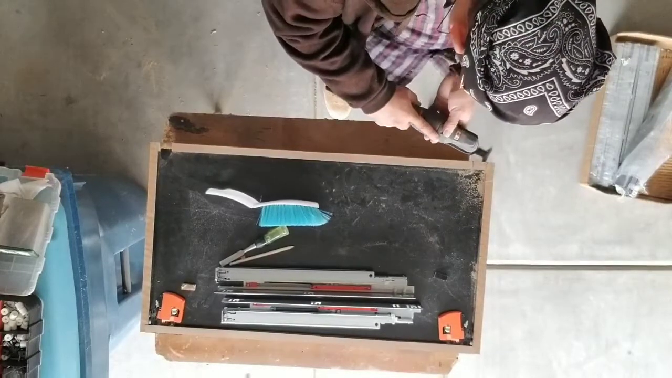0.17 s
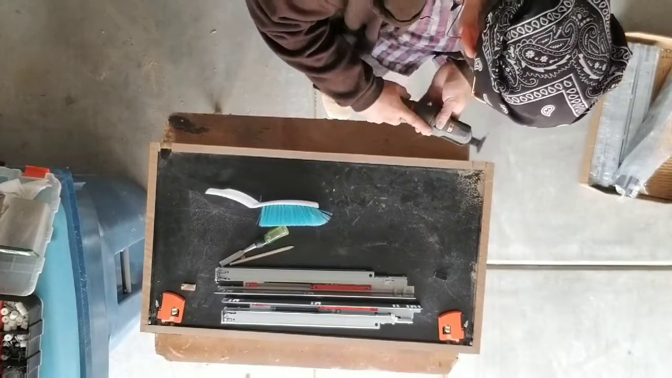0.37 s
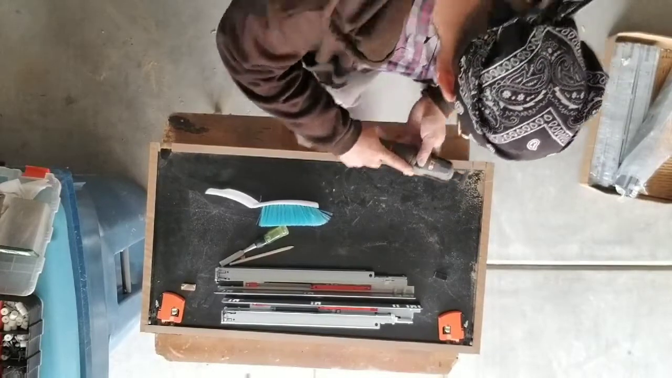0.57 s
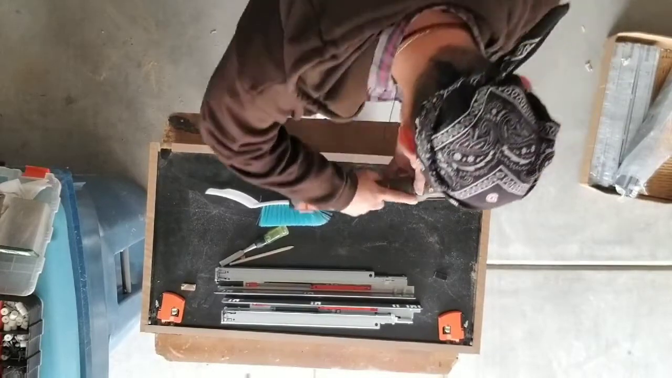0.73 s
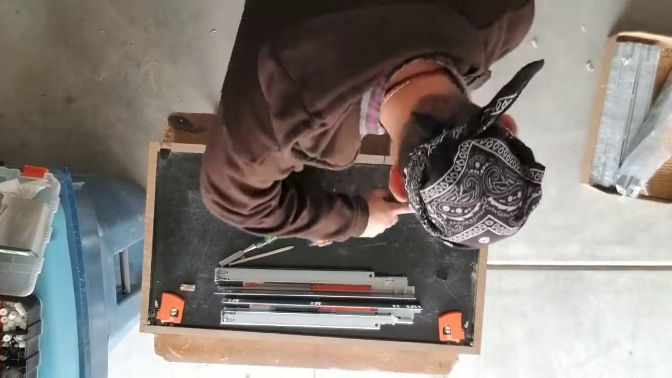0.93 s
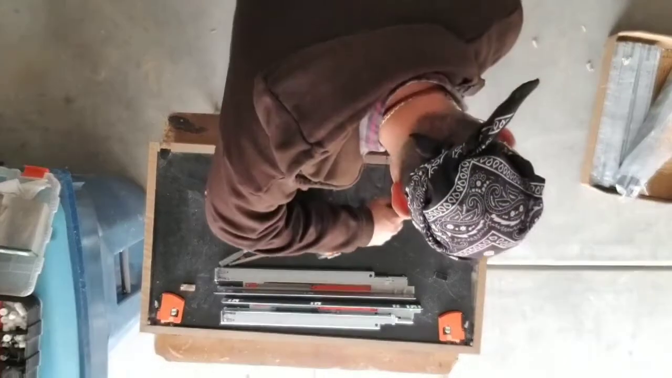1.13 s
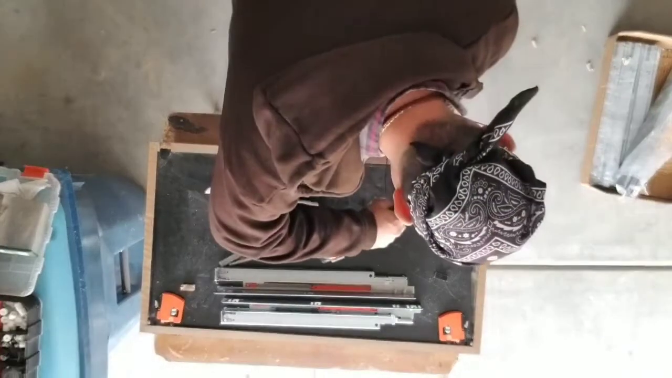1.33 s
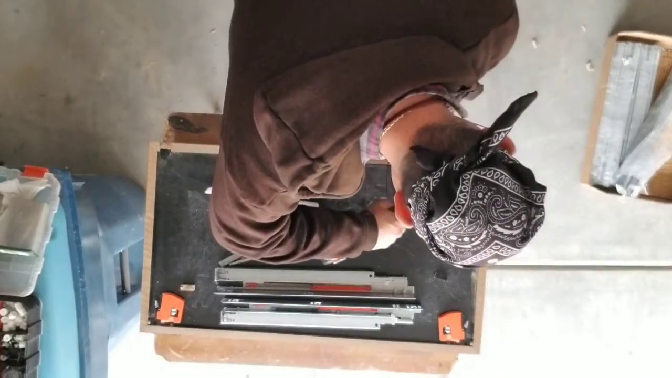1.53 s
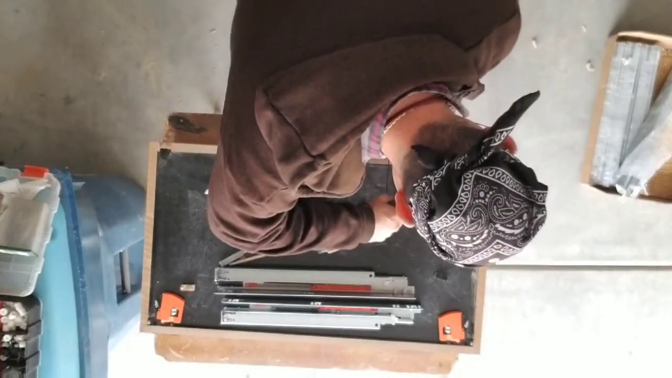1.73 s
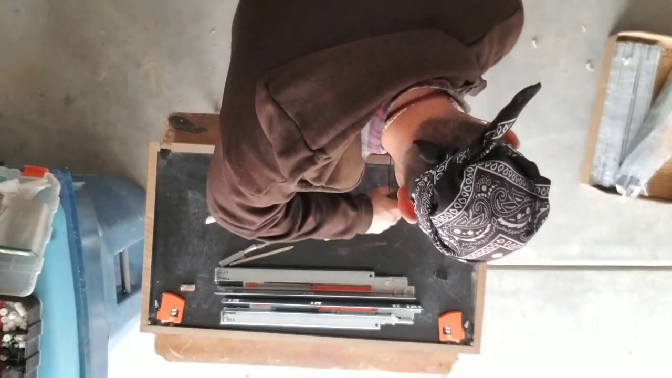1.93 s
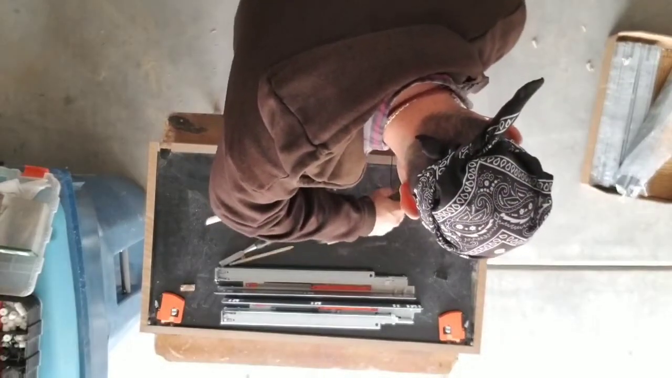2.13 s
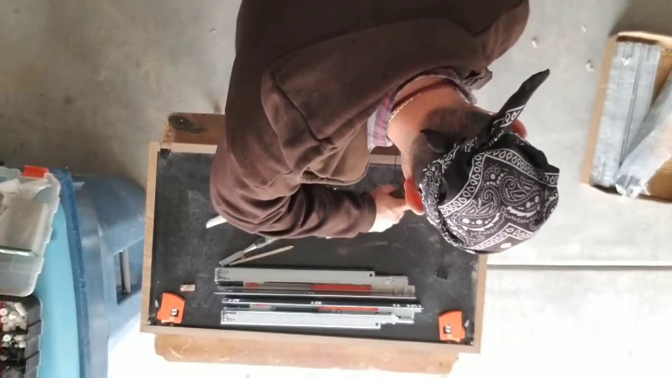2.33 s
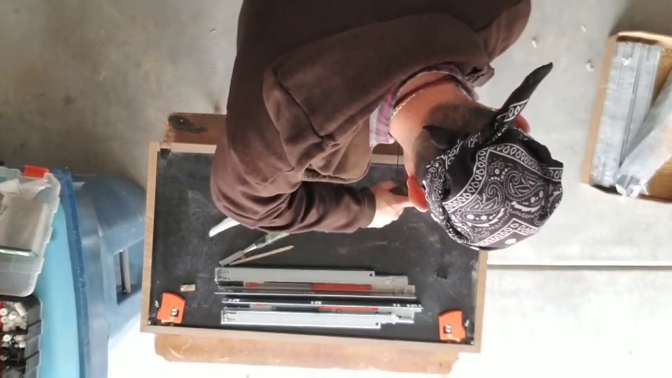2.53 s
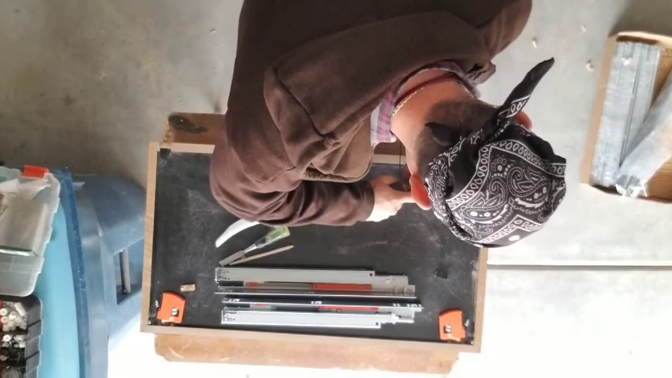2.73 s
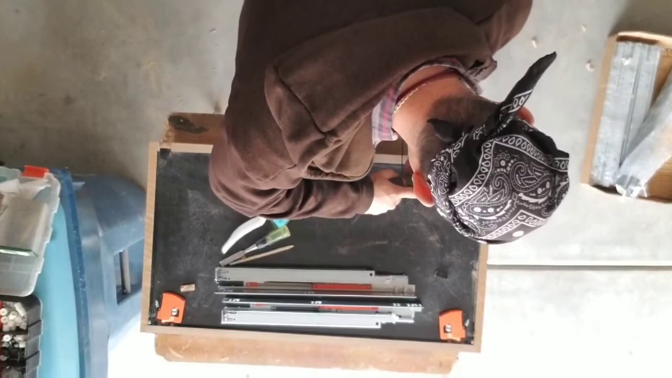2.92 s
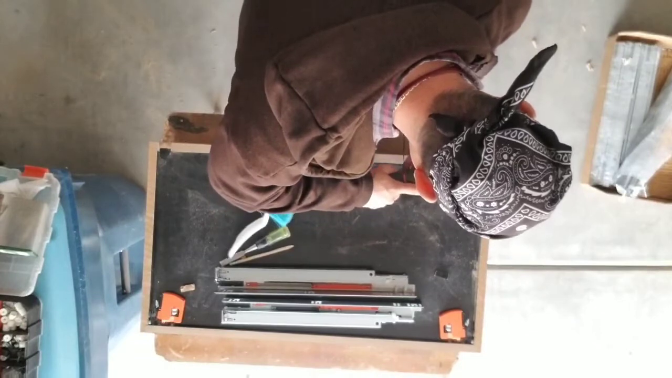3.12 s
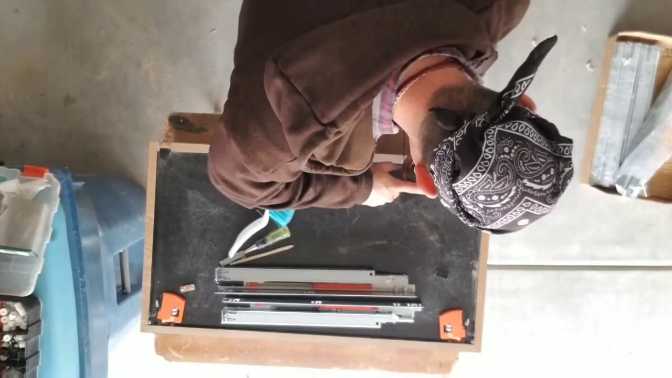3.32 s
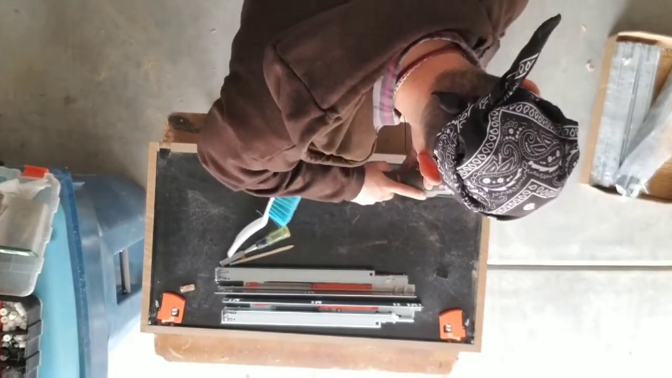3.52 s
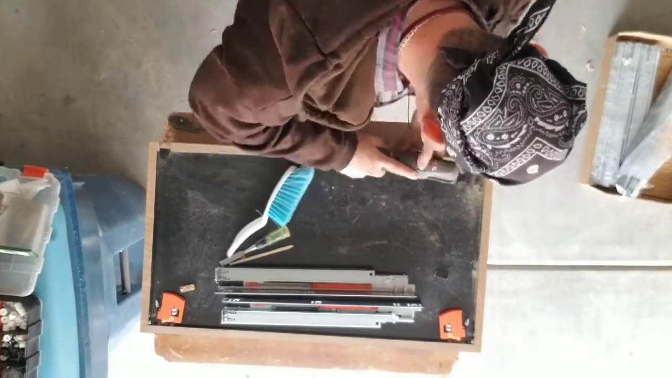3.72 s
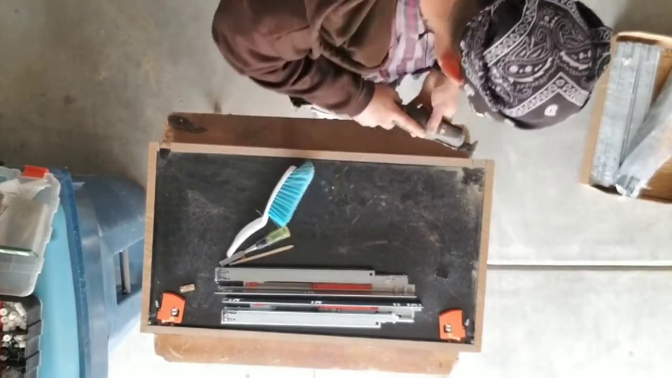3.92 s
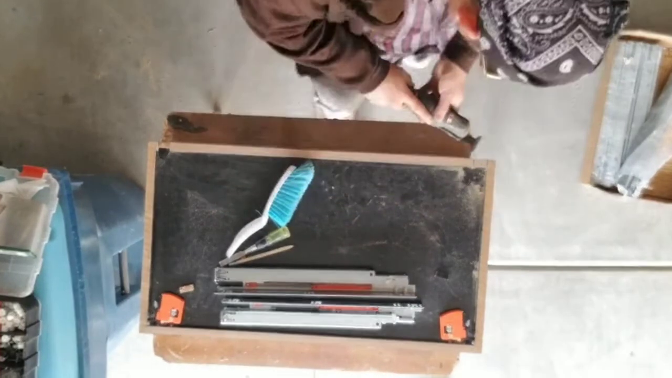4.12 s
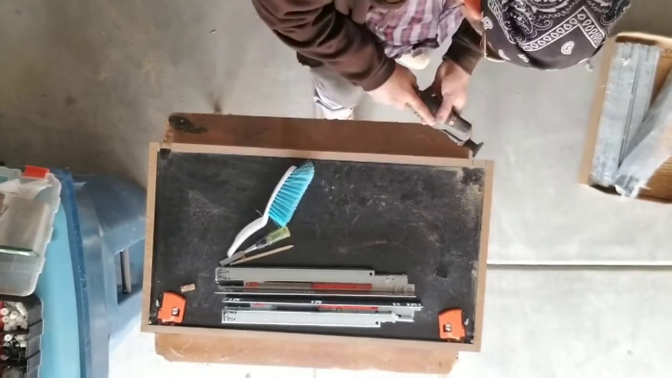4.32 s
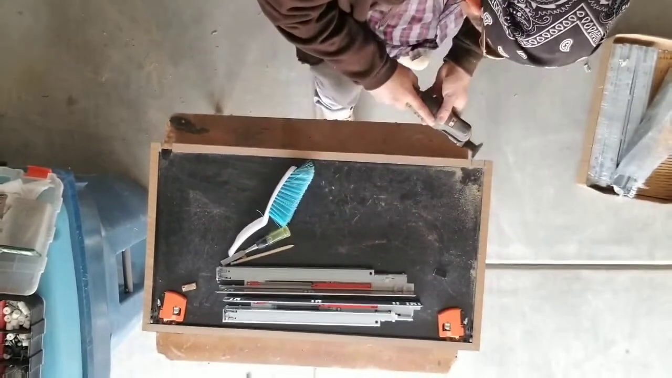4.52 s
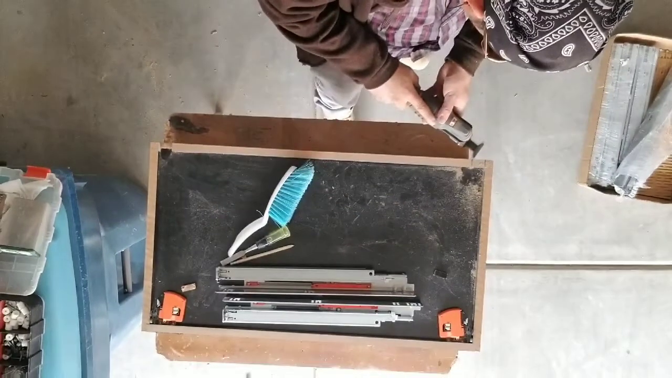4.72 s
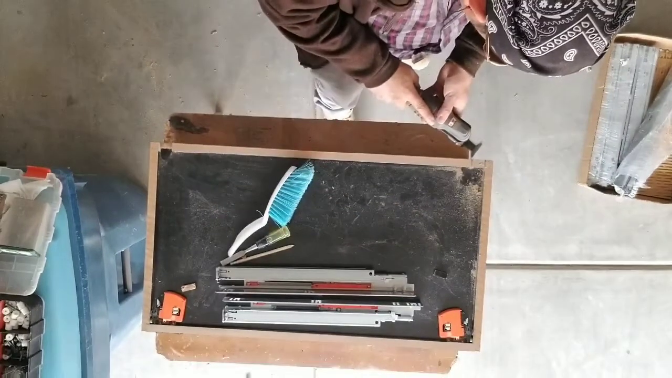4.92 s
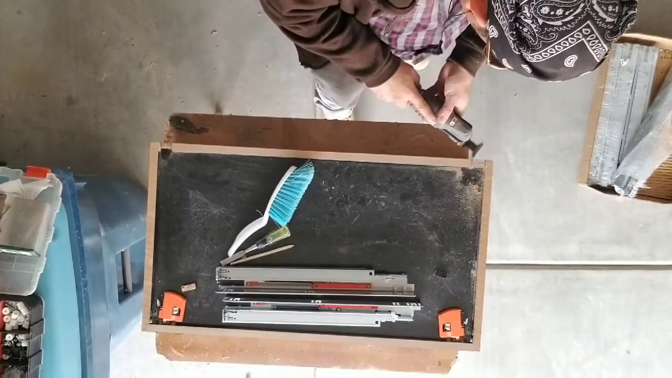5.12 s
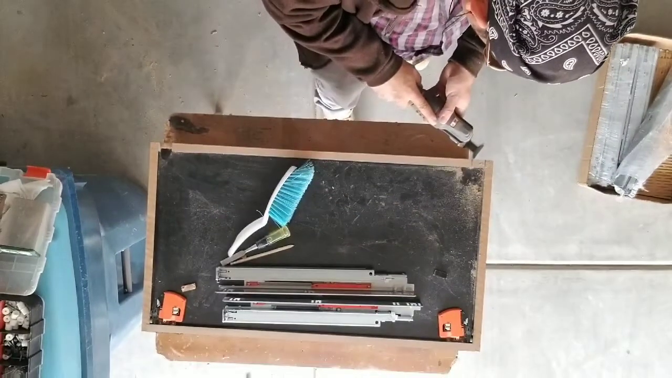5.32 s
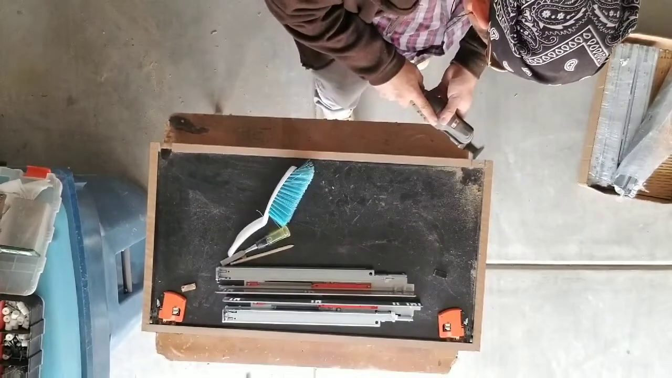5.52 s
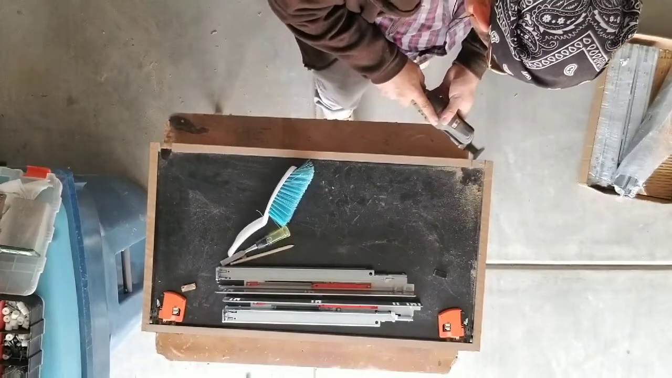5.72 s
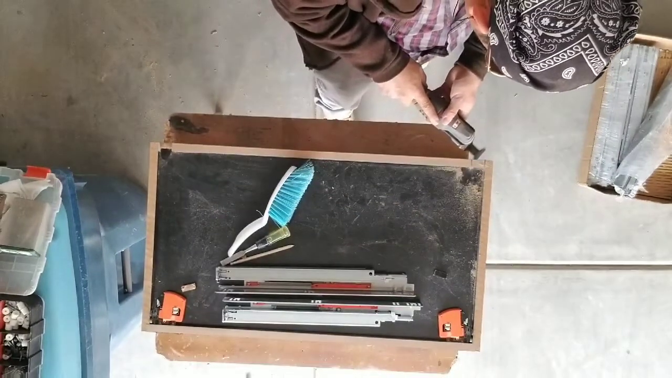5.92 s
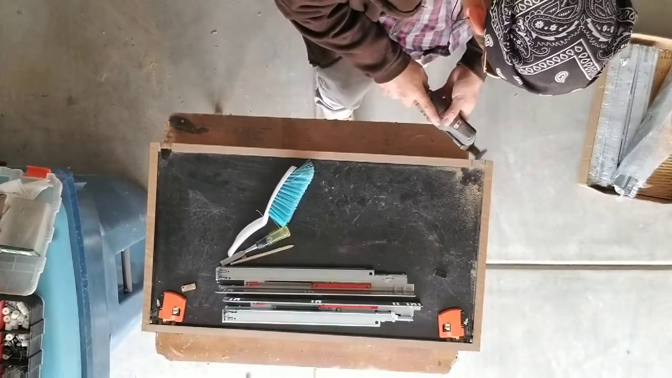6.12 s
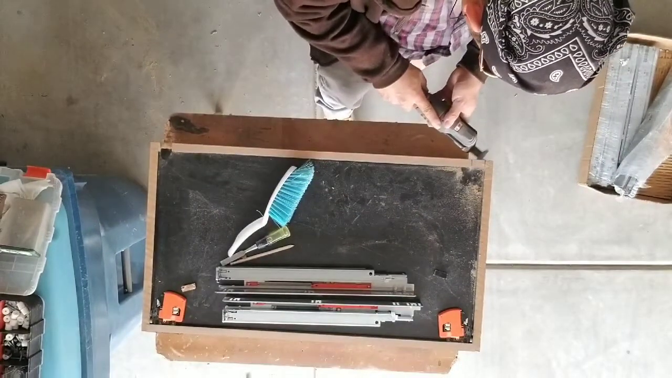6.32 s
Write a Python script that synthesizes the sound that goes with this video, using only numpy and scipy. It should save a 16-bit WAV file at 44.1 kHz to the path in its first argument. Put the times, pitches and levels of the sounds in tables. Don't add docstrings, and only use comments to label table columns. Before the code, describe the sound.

A harsh buzzing oscillating saw finishes one cut, then makes two more raspy cuts into a wooden box, ringing in a hard-walled garage.

```python
import sys
import numpy as np
from scipy import signal
from scipy.fft import rfft, irfft, next_fast_len
from scipy.io import wavfile
from scipy.ndimage import uniform_filter1d

SR = 44100
rng = np.random.default_rng(int(sys.argv[2]) if len(sys.argv) > 2 else 0)


def decibels_to_gain(level_db):
    exponent = np.asarray(level_db, float) / 20
    return 10 ** exponent


def bounce(signal):
    frames = np.transpose(np.atleast_2d(signal))
    limited = np.clip(frames, -1, 1)
    pcm = np.round(limited * 32767).astype(np.int16)
    wavfile.write(sys.argv[1], SR, pcm)


N = 281342
LEAD = .7
M = N + int(LEAD * SR)
STEP = 32
EDGE_S = .048


def unit(x):
    return x / np.sqrt(np.mean(x ** 2) + 1e-20)


def along(points, hz):
    f, v = np.transpose(points)
    return np.interp(np.log(hz + 1), np.log(f + 1), v)


def curves(tables):
    t = np.arange(M) / SR - LEAD
    s, *cols = np.transpose(np.vstack(tables))
    gate = np.zeros(M)
    for rows in tables:
        start, stop = rows[0][0], rows[-1][0]
        gate += (t < stop) & ((t >= start) | (start < .01))
    return [np.interp(t, s, c) for c in cols], uniform_filter1d(gate, size=96)


def swells(table):
    t = np.arange(0, M, STEP) / SR - LEAD
    start, length, *cols = np.transpose(table)[:, :, None]
    stop = start + length
    start = np.where(start < .01, -2 * LEAD, start)
    inside = np.minimum(t - start, stop - t)
    return np.sin(np.pi / 2 * np.clip(inside / EDGE_S + .5, 0, 1)) ** 2, cols


def smooth(slow):
    return uniform_filter1d(np.repeat(slow, STEP)[:M], size=2 * STEP)


def spells(table):
    shape, (db,) = swells(table)
    return smooth((shape * db).sum(0))


def wobble(rate, channels=2, step=1):
    knots = rng.standard_normal((channels, int(M * 200 / SR) + 4))
    at = np.arange(0, M, step) * rate / SR
    return np.array([np.interp(at, np.arange(len(k)), k) for k in knots])


def noise(gain, shared):
    a, b = rng.standard_normal((2, M))
    turn = np.arccos(np.clip(shared, -1, 1)) / 2
    pair = np.cos(turn) * a + np.sin(turn) * np.array([b, -b])
    pair[1] = np.roll(pair[1], shift=5)
    size = next_fast_len(M)
    return unit(irfft(rfft(pair, size) * gain(np.fft.rfftfreq(size, 1 / SR)), size)[:, :M])


def coloured(points, shared):
    return noise(lambda f: decibels_to_gain(along(points, f)), shared)


def resonances(table):
    return lambda f: sum(decibels_to_gain(db) / (1 + ((f - hz) / w) ** 2) for hz, w, db in table)


def patchy(x, depth_db):
    z = signal.stft(x, nperseg=256)[2]
    field = rng.standard_normal(z.shape[1:])
    field = uniform_filter1d(uniform_filter1d(field, size=3, axis=0), size=12, axis=1)
    return unit(signal.istft(z * decibels_to_gain(depth_db * unit(field)), nperseg=256)[1][:, :M])


# pitch_hz, level_db (per Hz)
QUIET = [(18, -50.5), (30, -14.5), (51, -13.5), (105, -4.5), (156, -14.5), (309, -8.5), (535, -16.5),
         (579, -11), (928, -18.5), (5090, -38), (15700, -41.5)]


def quiet_air():
    return decibels_to_gain(-66.5 + 2.5) * coloured(QUIET, .3)


# pitch_hz, fade_s (time to fall 60 dB)
GARAGE = [(250, 0.26), (600, 1), (1000, 0.84), (3000, 0.79), (8000, 0.53), (15000, 0.098)]


def garage(x):
    burst = rng.standard_normal((2, int(1.5 * SR)))
    hz, t, z = signal.stft(burst, SR, nperseg=256)
    fade = decibels_to_gain(-60 * t / along(GARAGE, hz)[:, None])
    tail = signal.istft(z * fade, SR, nperseg=256)[1]
    late = np.pad(x, ((0, 0), (400, 0)))
    return signal.fftconvolve(late, tail / np.linalg.norm(tail[0]), axes=1)[:, :M]


def panel(x, hz=1020, t60=0.54, db=-3):
    pole = decibels_to_gain(-60 / (t60 * SR))
    turn = 2 * np.pi * hz / SR
    return decibels_to_gain(db) * signal.lfilter([1 - pole, 0, pole - 1], [1, -2 * pole * np.cos(turn), pole ** 2], x, axis=1)


# time_s, level_db
SHUFFLE = [
    [(0.78, -62), (0.998, -51.5), (1.05, -71), (1.07, -32)],
    [(3.95, -61), (3.958, -64), (3.98, -65.5), (4.114, -51.5), (4.176, -65), (4.3, -79.5)],
]
# pitch_hz, level_db (per Hz)
CLOTH = [(120, -47.5), (200, -3.5), (299, -5.5), (1200, -18), (2070, -12.5), (3640, -9), (3850, -6),
         (4300, -8), (15700, -29)]


def shuffle():
    (brush_db,), gate = curves(SHUFFLE)
    return gate * decibels_to_gain(brush_db + 1.7 * wobble(6.4, channels=1)) * coloured(CLOTH, 0.49)


# start_s, peak_db, pitch_hz, length_s
CREAKS = [
    (0.823, -49, 302.3, 0.06),
    (3.762, -46, 410, 0.035),
    (3.832, -48, 410, 0.019),
    (3.916, -42, 407, 0.013),
    (3.992, -46, 410, 0.016),
    (4.071, -46.5, 402, 0.023),
    (4.133, -54, 418, .02),
]


def creaks():
    out = np.zeros((2, M))
    for s, db, hz, length in CREAKS:
        t = np.arange(int(length * SR)) / SR
        hollow = np.sin(2 * np.pi * hz * t) + .12 * np.sin(2 * np.pi * 3.8 * hz * t)
        shape = np.sin(np.pi * np.sqrt(t / length)) ** .5
        out[:, round((s + LEAD) * SR):][:, :len(t)] += decibels_to_gain(db) * shape * hollow
    return out


# pitch_hz, level_db (per Hz)
RUMBLE = [(12, -53), (20, -10), (43, -13), (81, -2.5), (199, -12), (220, -11.5), (290, -19), (480, -120)]
# start_s, length_s, gain_db
BUMPS = [
    (2.35, .1, 5),
    (2.68, .14, 11),
    (2.88, .25, 6),
    (5.36, .12, 6),
    (5.92, .5, 7),
]


def rumble(motor_db):
    level_db = motor_db - 25 + spells(BUMPS) + 2.2 * wobble(4.9)
    return decibels_to_gain(level_db) * coloured(RUMBLE, 0.1)


# pitch_hz, width_hz, level_db
WHINE = [(11680, 30, 4.5), (13000, 210, -9.5), (15028, 360, -6.5)]
# start_s, length_s, gain_db
WHINES = [
    (0, .5, 7),
    (1.1, .17, 13),
    (1.27, .25, 6),
    (3.44, .12, 6),
    (4.65, .62, 8),
    (5.27, .66, 13),
]


def whine(motor_db):
    level_db = motor_db - 20.5 + spells(WHINES) + 7.5 + 2.8 * wobble(9, channels=1)
    return decibels_to_gain(level_db) * noise(resonances(WHINE), 0.85)


# pitch_hz, level_db (per Hz)
HISS = [(3820, -12), (6500, -11.5), (7960, -5.5), (10200, -3), (12200, -1), (13300, -1), (15100, -7),
        (15700, -12.5)]


def hiss(motor_db, free):
    return decibels_to_gain(motor_db - 7 * free + 1.4 * wobble(13, channels=1)) * coloured(HISS, 0.084)


# pitch_hz, width_hz, level_db
BOX = [(297, 44, -4), (410, 130, -6.5), (725, 105, 3.5), (1040, 33, 5.5)]


def rattle(contact_db, chatter, free):
    level_db = contact_db - 14.5 + 7 * np.minimum(chatter, 1.2) + 13 * np.sqrt(free)
    return decibels_to_gain(level_db + 2.9 * wobble(25, channels=1)) * noise(resonances(BOX), 0.16)


# pitch_hz, level_db (per Hz)
RASP = [(60, -55.5), (200, -15), (400, -15.5), (700, -17), (1500, 2.5), (2200, 2.5), (4000, 2.5),
        (6500, -1.5), (7500, -8), (9000, -26.5)]


def rasp(contact_db, bite_db, teeth_db, free):
    level_db = contact_db + 4.6 - .4 * np.abs(teeth_db) + .15 * bite_db + 3.2 * free
    return decibels_to_gain(level_db + 1.5 * wobble(18, channels=1)) * patchy(coloured(RASP, .3), 3.)


# time_s, swings_hz, motor_db
CUTS = [
    [(0, 249.2, -26.5), (.13, 253.9, -28), (.19, 256.8, -30), (.24, 259.8, -27)],
    [(1.067, 251.7, -27), (1.2, 282.4, -24.5), (1.4, 282.9, -27.5), (1.57, 262.4, -29), (2.2, 258.7, -27.5),
     (2.35, 250.4, -25), (2.8, 248.2, -25), (3.34, 255.3, -26), (3.49, 253.6, -28)],
    [(4.458, 222.1, -39), (4.63, 206, -29.5), (4.9, 236, -27), (4.95, 273.6, -26.5), (5.1, 280.7, -26.5),
     (5.45, 280, -26), (5.94, 274.1, -29.5), (6.09, 268.4, -29), (6.38, 264.8, -29)],
]
KICK_DB, KICK_S = 22, .026
COAST_DB_PER_S, BRAKE_DB_PER_S3, COAST_S = 42, 270, .53
LOOSE, LOOSE_START_S = .6, .06


def motor():
    (swing_hz, motor_db), cutting = curves(CUTS)
    t, free, rolling = np.arange(M) / SR - LEAD, np.zeros(M), np.zeros(M)
    for rows in CUTS:
        since, after = t - rows[0][0], t - rows[-1][0]
        if rows[0][0] > .01:
            motor_db = motor_db - KICK_DB * (since > -.01) * np.exp(-np.abs(since) / KICK_S)
            free = free + LOOSE * (since > 0) * np.exp(-np.abs(since) / LOOSE_START_S)
        coasting = (after >= 0) & (after < COAST_S)
        coast_db = rows[-1][2] - COAST_DB_PER_S * after - BRAKE_DB_PER_S3 * after ** 3
        motor_db = np.where(coasting, coast_db, motor_db)
        free = free + coasting * (1 - np.exp(-np.abs(after) / .035))
        rolling = rolling + coasting * after
    return swing_hz, motor_db, free, rolling, cutting


# start_s, length_s, bite_db, teeth_db, resonance_hz (loudest)
PUSHES = [(0, 0.089, 10, 3.5, 2010), (1.15, .28, 2.5, 5.5, 1950), (1.55, .42, 1.5, 3.5, 1800),
          (1.99, .28, 5.5, 3, 2500), (2.27, .22, 7, 4.5, 1910), (2.52, .44, 6, 7.5, 2050),
          (3.0, .11, 8, 4, 1850), (3.13, .33, 7, 3, 1900), (4.53, .19, 4.5, -3, 2200),
          (4.72, .16, 2.5, -3.5, 2500), (4.88, .26, 9.5, 0.5, 2300), (5.34, .16, 10, 4, 2600),
          (5.54, .18, 9, -3, 2250), (5.73, .13, 2.5, -2.5, 2300), (5.98, .47, -.7, 3, 2450)]
# start_s, length_s, scatter_rad (added, at 2 kHz), contrast (strong-weak swings, 0-1)
SKIPS = [(.19, .1, .2, .1), (1.05, .14, .75, .2), (1.2, .34, .25, .1), (1.93, .2, .03, .5),
         (2.26, .13, .3, .1), (3.4, .1, .25, .15), (4.44, .52, 1.5, .3), (4.96, .26, .17, .1),
         (5.22, .1, .75, .2), (5.92, .11, .55, .2)]


def hand():
    push, (bite_db, teeth_db, bite_hz) = swells(PUSHES)
    skip, (scatter, contrast) = swells(SKIPS)
    chatter = .27 + (skip * scatter).sum(0)
    return push, bite_hz, (push * bite_db).sum(0), (push * teeth_db).sum(0), chatter, (skip * contrast).sum(0)


# start_s, length_s, gain_db (over idle)
DRUMS = [
    (0, .2, 18.5),
    (1.15, .27, 21.5),
    (1.42, 0.094, 10),
    (1.6, 2, 14.5),
    (4.95, 0.58, 5),
    (5.68, .8, 18),
]


def drum(phase, motor_db):
    level_db = motor_db - 20 + spells(DRUMS) + 2.4 * wobble(8, channels=1)
    return decibels_to_gain(level_db + 2.5) * np.sin(phase + 0.28 * wobble(2.7))


# start_s, length_s, pitch_hz, gain_db (over idle)
SINGS = [(0, 0.22, 508, 10), (1.16, 0.29, 560, 10.5), (4.94, .2, 560, 14.5), (5.3, .28, 560, 7),
         (5.8, .5, 545, 10), (0, .15, 752, 13.5), (4.47, .2, 1290, 13), (1.53, 0.76, 790, 13),
         (3.15, 0.32, 770, 11.5), (4.6, .33, 672, 14), (.08, .13, 1015, 11), (1.72, 0.56, 1040, 13.5),
         (2.66, .3, 1000, 5), (3.07, .38, 1016, 14.5), (5.02, .15, 1122, 11), (5.33, 0.54, 1115, 7.5),
         (1.75, 0.43, 1300, 14), (2.2, .36, 1255, 6), (2.72, .3, 1260, 10), (3.06, .39, 1300, 16),
         (5.62, .36, 1385, 8), (4.58, .14, 1050, 6), (6.08, .4, 1335, 9), (1.17, 0.33, 1688, 11),
         (1.6, 0.54, 1566, 16), (2.72, 0.29, 1497, 10.5), (2.55, .3, 748, 4), (4.95, .18, 1683, 15),
         (5.3, 0.22, 1684, 13.5), (5.8, .45, 1626, 7)]
IDLE_DB = [-10.5, -9.5, -6.5, -5, -7]


def wall_db(k, hz):
    sing, (wall_hz, gain_db) = swells(SINGS)
    nearness = np.exp(-(np.log(hz / wall_hz) / 0.071) ** 4)
    return IDLE_DB[k - 2] + (sing * gain_db * nearness).sum(0)


# pitch_hz, level_db (of the orders)
RING = [(1100, 12.5), (1500, 0), (2000, -2), (2600, -2), (3500, -4), (4800, -5), (6200, -8), (7000, -17.5),
        (8000, -20)]


def blade_db(hz):
    push, bite_hz, bite_db, teeth_db, _, _ = hand()
    high = np.clip(np.log2(hz / 2600) / .75, 0, 1)
    level = (1 - high) * (1.5 + bite_db) + high * (5.5 + teeth_db - 6.0) + along(RING, hz)
    return level + 3 * (push * np.exp(-((hz - bite_hz) / 400) ** 2)).sum(0)


def orders(swing_hz, motor_db, gate, count=27):
    *_, chatter, contrast = hand()
    slow_hz, slow_db = swing_hz[::STEP], motor_db[::STEP]
    phase = 2 * np.pi * np.cumsum(swing_hz * (1 + 0.001557 * wobble(30, channels=1)[0])) / SR
    out = np.zeros((2, M))
    uneven = 1 + 2 * smooth(contrast) * np.cos(phase / 2)
    turn = carrier = np.exp(1j * phase)
    pressure_db = 1.5 * wobble(30, channels=1, step=STEP)
    for k in range(2, count + 1):
        hz = k * slow_hz
        skip = chatter * (hz / 2000) ** .9 * wobble(110, step=STEP)
        start = 2 * np.pi * rng.random((2, 1))
        low = k <= len(IDLE_DB) + 1
        if low:
            level = wall_db(k, hz) + 4 + 3.3 * wobble(18, step=STEP)
            start = start[0] + (-1) ** k * np.pi / 4.6 * np.array([[1], [-1]])
        else:
            level = blade_db(hz) + 3.5 * wobble(14, step=STEP) + 2.8 * wobble(32, step=STEP)
        level = level + slow_db + pressure_db
        drift = start + (.4 if low else 1.3) * wobble(5, step=STEP) + skip
        carrier = carrier * turn
        slow_line = decibels_to_gain(level) * np.exp(1j * drift)
        line = (np.repeat(slow_line, STEP, axis=1)[:, :M] * carrier).imag
        out = out + (line if low else line * uneven)
    return (out + drum(phase, motor_db)) * gate, phase


def saw():
    swing_hz, motor_db, free, rolling, cutting = motor()
    gate = np.maximum(cutting, rolling > 0)
    contact_db = motor_db - 30 * rolling
    tones, phase = orders(swing_hz, motor_db, cutting)
    bite_db, teeth_db, chatter = [smooth(c) for c in hand()[2:5]]
    stroke = 1 + 0.11 * np.sin(phase) + 0.056 * np.sin(2 * phase + 0.53)
    grind = stroke * (rasp(contact_db, bite_db, teeth_db, free) + hiss(motor_db, free))
    grind = grind + rattle(contact_db, chatter, free) + whine(motor_db) + rumble(motor_db)
    return tones, gate * grind


def scene():
    tones, grind = saw()
    spread = grind + shuffle() + creaks()
    room = garage(decibels_to_gain(-8) * spread + tones / 6) + panel(tones)
    left_right = decibels_to_gain([[2.2], [-.4]])
    return ((tones + spread + room) * left_right + quiet_air())[:, M - N:]


def band_limit(x):
    return signal.sosfilt(signal.butter(12, 16770, fs=SR, output="sos"), x)


def record(dry):
    size = next_fast_len(N + SR // 4)
    x = irfft(rfft(dry, size) * (np.fft.rfftfreq(size, 1 / SR) < 15750), size)[:, :N]
    x = x / (1 + np.abs(x) ** 4) ** (1 / 4)
    return band_limit(x)


dry = scene()
out = record(dry)
bounce(out)
```